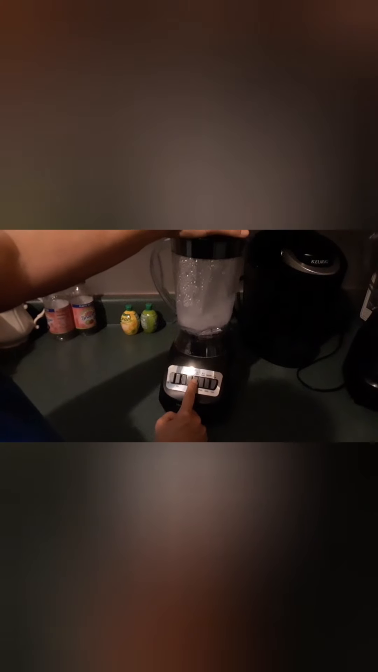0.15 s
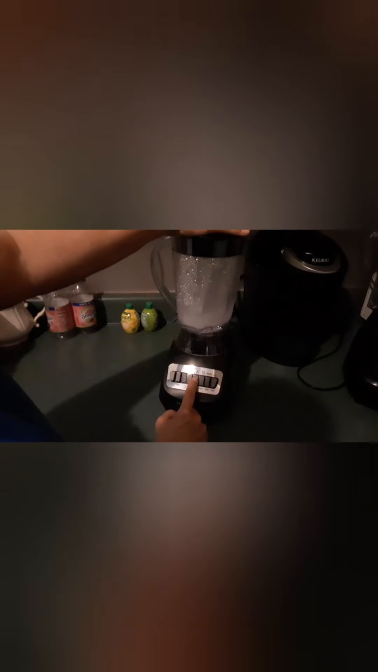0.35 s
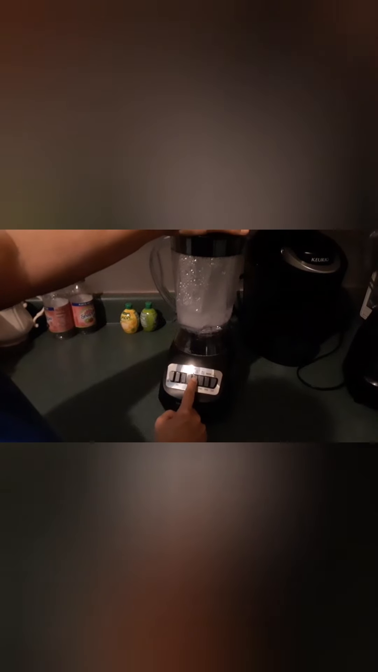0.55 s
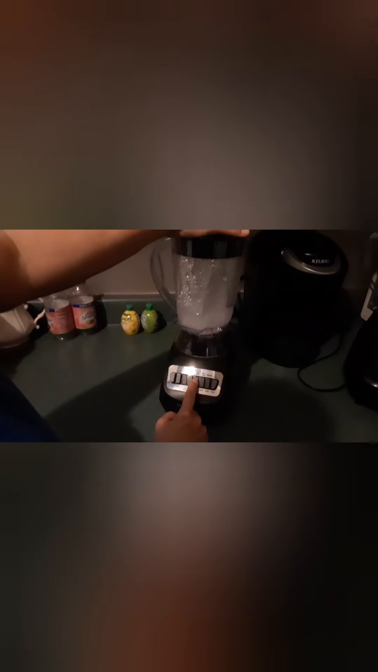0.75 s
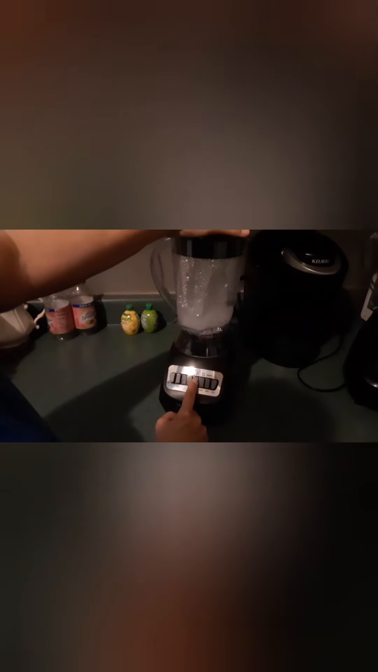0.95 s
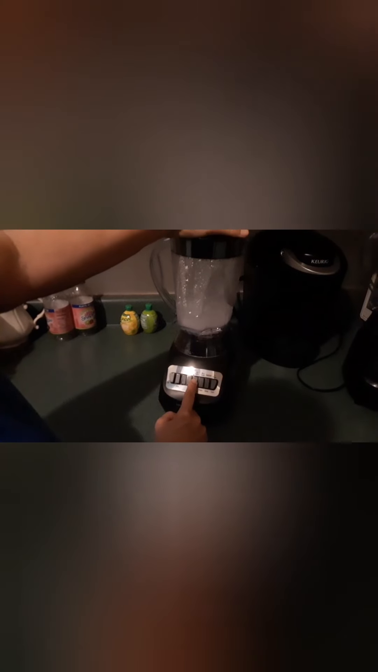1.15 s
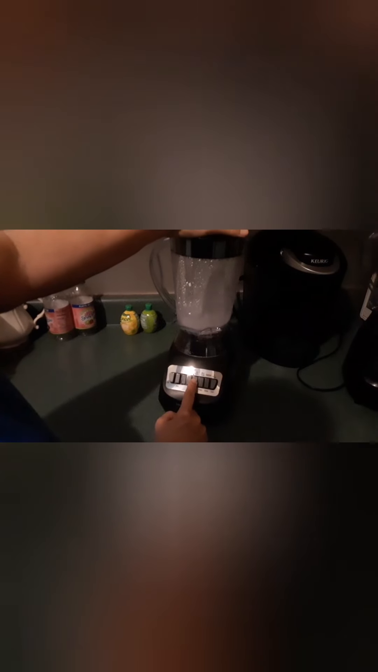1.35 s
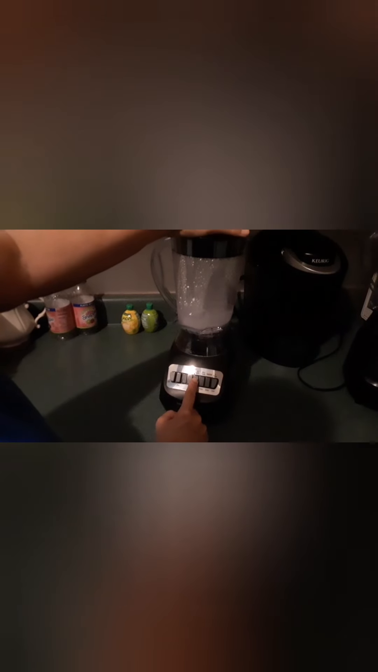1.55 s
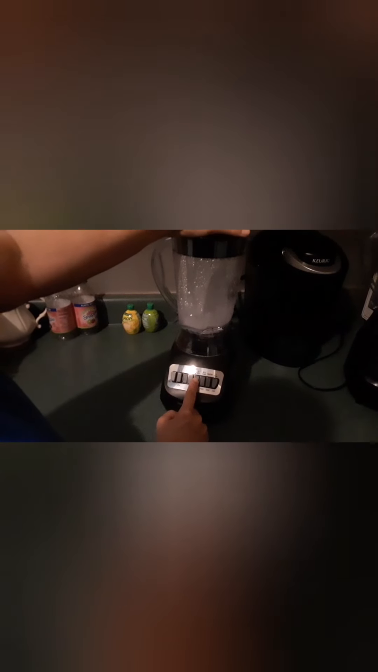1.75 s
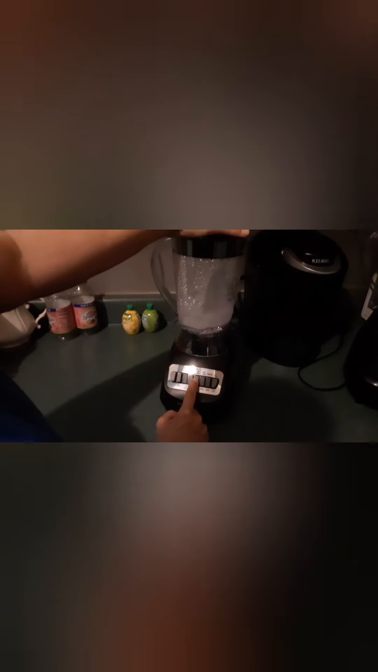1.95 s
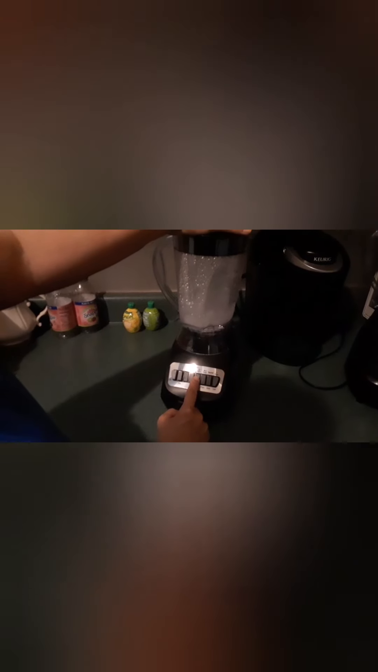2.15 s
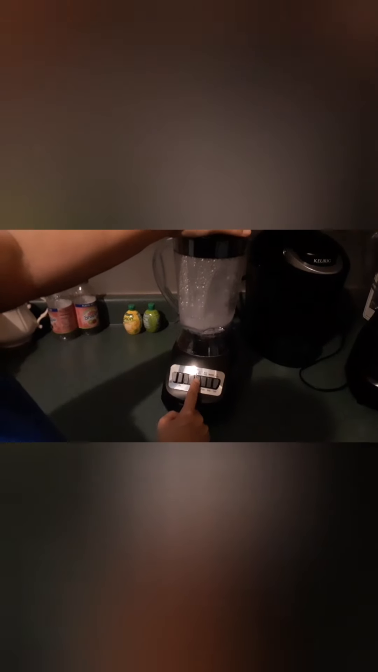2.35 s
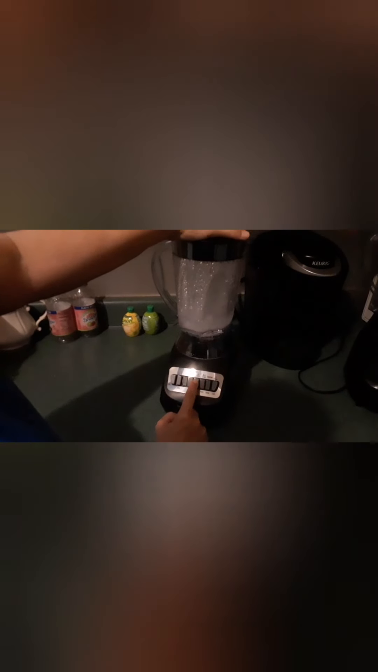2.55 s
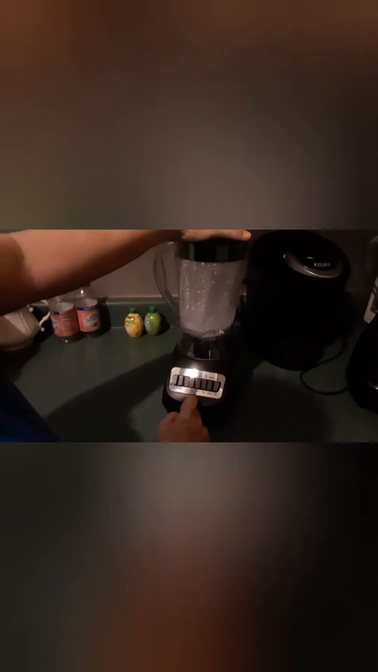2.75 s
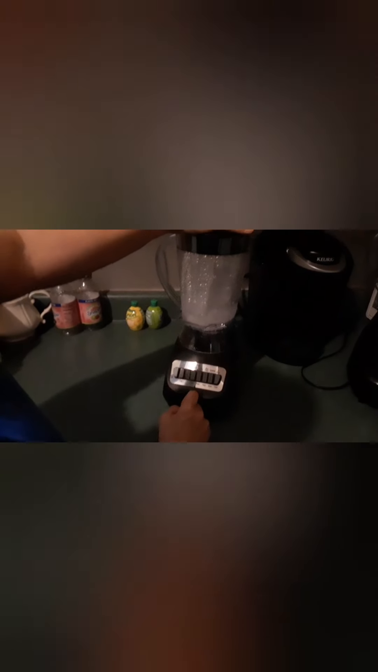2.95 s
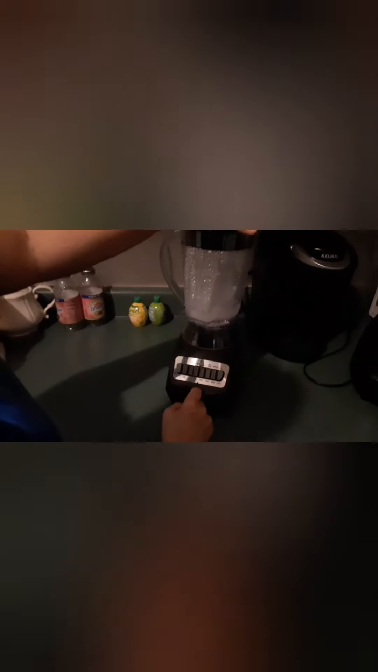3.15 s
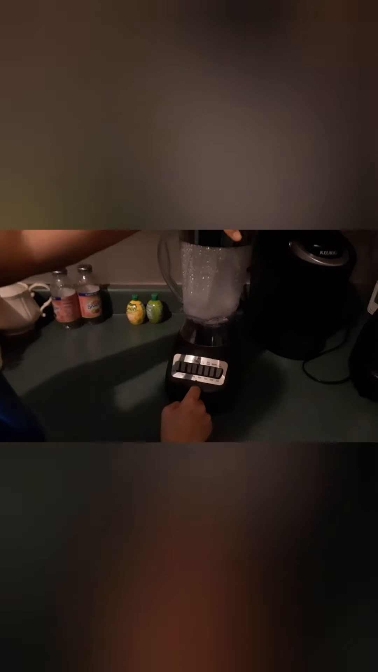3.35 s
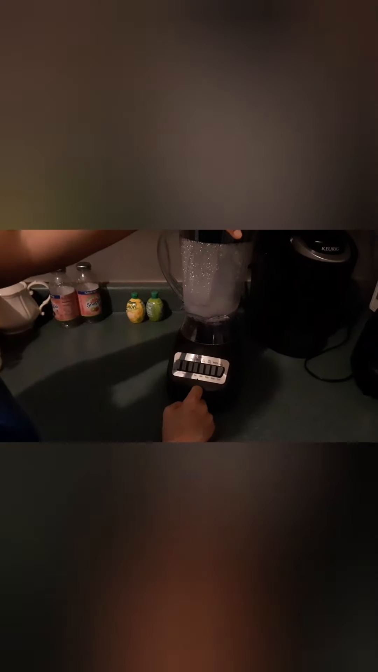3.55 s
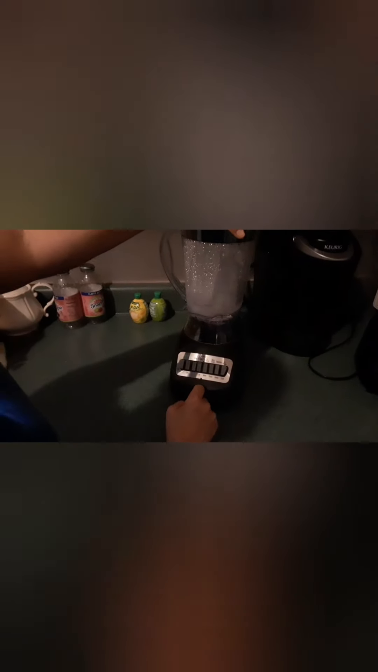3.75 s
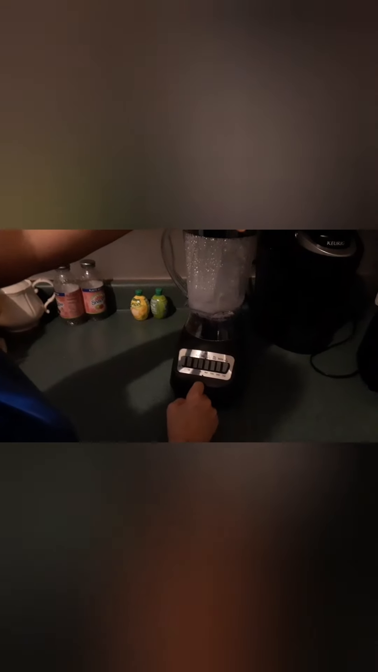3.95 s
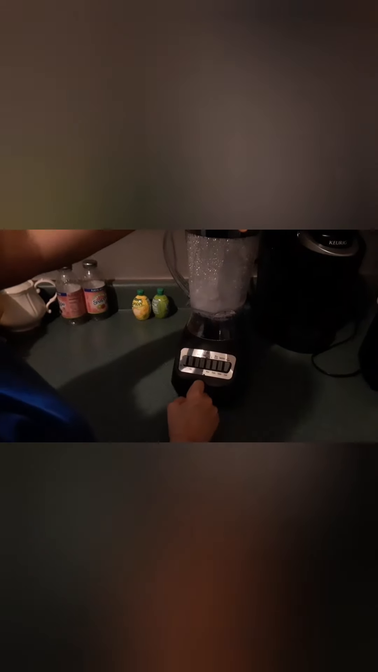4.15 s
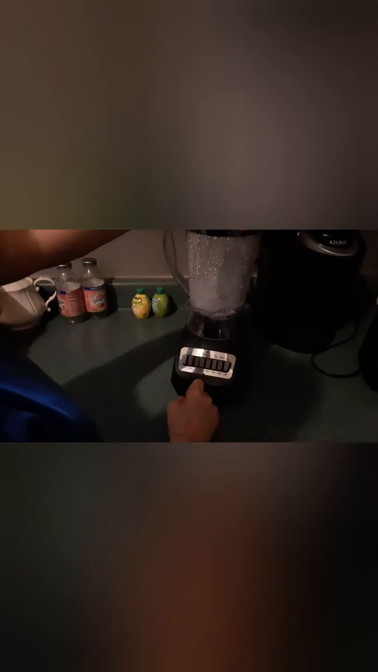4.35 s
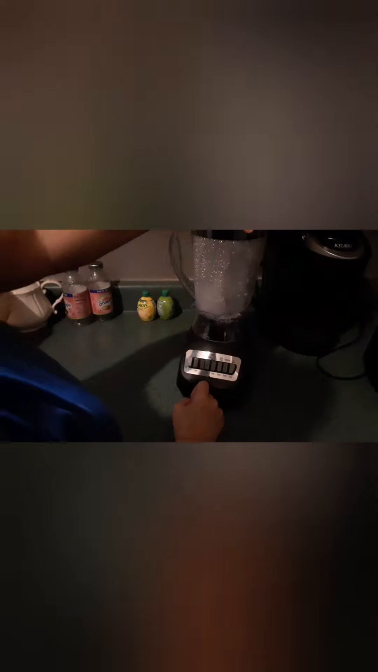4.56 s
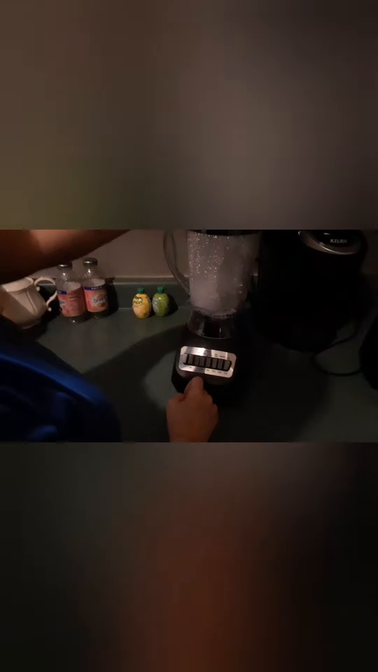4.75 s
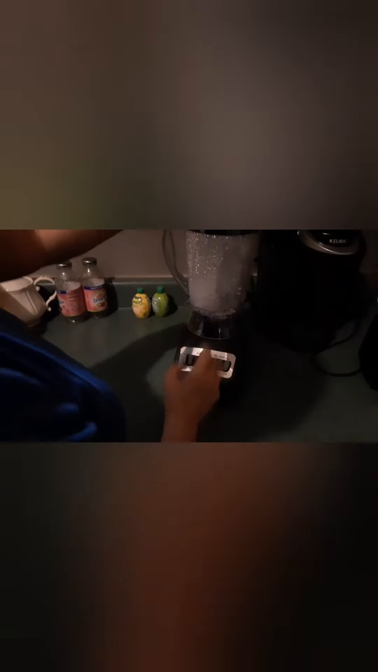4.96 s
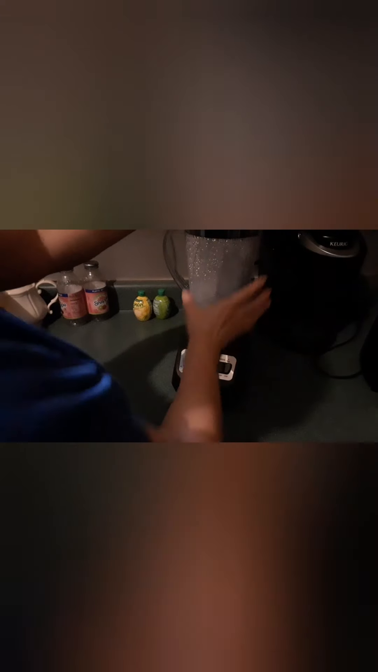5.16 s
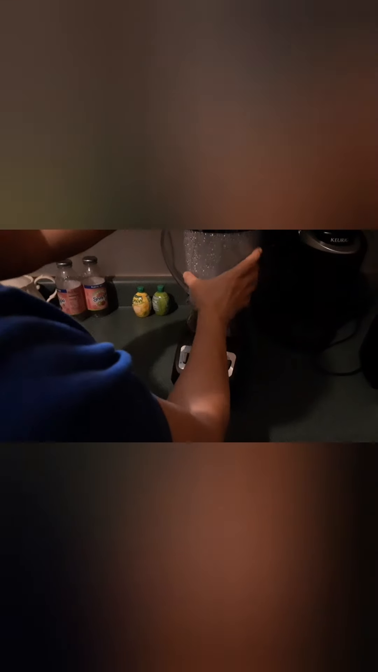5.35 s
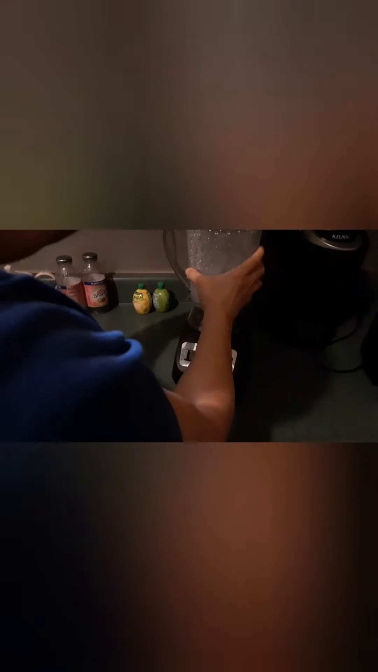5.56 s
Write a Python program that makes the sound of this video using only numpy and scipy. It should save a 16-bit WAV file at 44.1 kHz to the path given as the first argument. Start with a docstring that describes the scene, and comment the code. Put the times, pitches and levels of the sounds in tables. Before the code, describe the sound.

A blender runs with a steady whine and a gritty rush of ice against its plastic jar, a little right of close stereo microphones in a kitchen. The power cuts and the motor coasts down in pitch, scraping and squeaking faintly while a few ice lumps crunch and clatter. A quiet appliance hum remains once it stops. Finally, fingers tap the jar and a palm slides into a grip.

```python
"""A blender on a kitchen counter, a little right of a close pair of microphones. It churns crushed ice in
its plastic jar while the base shakes and the rotor whines. Switched off at about 2 s, it coasts: the
harmonics glide down, the brushes rub and squeak faintly, and the slowing blades knock the last lumps
about. The low hum of the room comes forward as the rotor stops, at about 4.5 s. Last, a hand takes
hold of the jar."""
import sys
import numpy as np
from scipy import signal
from scipy.fft import rfft, irfft, next_fast_len
from scipy.io import wavfile

SR = 44100
rng = np.random.default_rng(int(sys.argv[2]) if len(sys.argv) > 2 else 0)


def bounce(signal):
    """Save signal as a 16-bit WAV file at the path given by the first command-line argument."""
    frames = np.transpose(np.atleast_2d(signal))
    limited = np.clip(frames, -1, 1)
    pcm = np.round(limited * 32767).astype(np.int16)
    wavfile.write(sys.argv[1], SR, pcm)


N = 251370
TIME = np.arange(N) / SR
FULL_SPEED_HZ, OFF_S, STOP_S = 317.6, 2.087, 4.52      # rotor speeds are in turns per second

# Spectrum of the base when shaken or jolted. Each row: frequency in Hz, relative level in dB.
BASE_RUMBLE = [(24, -71), (40, -36.5), (75, -25), (112, -13), (189, -7), (278, -8.5), (322, 2), (399, -2),
               (427, -9), (462, -5), (600, -8.5), (780, -30), (1320, -120)]


def from_db(db):
    """Decibels to gain."""
    return 10 ** (np.asarray(db) / 20)


def rms_one(x):
    """Scale to unit power."""
    return x / np.sqrt(np.mean(x ** 2) + 1e-20)


def at_hz(points, hz):
    """Read a table on a log-frequency axis."""
    known_hz, values = np.transpose(points)
    return np.interp(np.log(np.maximum(hz, 1)), np.log(known_hz), values)


def drift(rate):
    """A smooth random wander of unit power, with `rate` new values a second."""
    knots = rng.standard_normal(int(rate * N / SR) + 3)
    fine = signal.resample_poly(knots, 10, 1)
    return rms_one(np.interp(TIME * 10 * rate, np.arange(len(fine)), fine))


def butter(x, edge_hz, kind, order=2):
    """Butterworth filter."""
    return signal.sosfilt(signal.butter(order, edge_hz, kind, fs=SR, output="sos"), x)


def colour(pair, spectrum):
    """Give two unrelated signals a spectrum, and make them alike in the bass as at two close microphones."""
    # Each row: frequency in Hz, left-right likeness (capped below at 0.99, nearly identical).
    likeness = [(60, 0.5), (140, 4), (350, 1.2), (700, 0.9), (1400, 0.06), (3000, 0.26), (12000, 0)]
    size = next_fast_len(N + SR // 10)
    hz = np.arange(size // 2 + 1) * SR / size
    alike = np.clip(at_hz(likeness, hz), -.99, .99)
    mid, side = rfft(pair, size) * from_db(at_hz(spectrum, hz))
    left_right = np.sqrt(1 + alike) * mid + np.sqrt(1 - alike) * side * [[1], [-1]]
    return rms_one(irfft(left_right, size)[:, :N])


def hiss(spectrum):
    """Smooth stereo noise with a spectrum."""
    return colour(rng.standard_normal((2, N)), spectrum)


def grains(per_s, spread_db):
    """Tiny random impacts of uneven size."""
    born = rng.random((2, N)) < per_s / SR
    return rms_one(born * rng.standard_normal((2, N)) * from_db(spread_db * rng.standard_normal(N)))


def partial(angle, waver, rate=14):
    """A tone whose strength and phase waver, differently at each microphone."""
    sway = np.array([drift(rate) + 1j * drift(rate) for side in range(2)])
    return np.sqrt(2) * np.real((1 + waver * sway) * np.exp(1j * angle)) / np.sqrt(1 + 2 * waver ** 2)


def resonate(x, peaks):
    """Parallel resonances of alternating sign, scaled to unit power."""
    out = 0
    for k, (hz, width_hz, db) in enumerate(peaks):
        radius = np.exp(-np.pi * width_hz / SR)
        forward = np.array([1, 0, -1]) * (1 - radius ** 2) / 2
        feedback = [1, -2 * radius * np.cos(2 * np.pi * hz / SR), radius ** 2]
        out = out + (-1) ** k * from_db(db) * signal.lfilter(forward, feedback, x)
    return rms_one(out)


def kitchen(x, wet_db, t60_s=0.17):
    """Dense reflections off counter, wall and cupboards; in the bass both microphones hear the same."""
    t = np.arange(SR // 2) / SR
    tail = rng.standard_normal((2, len(t))) * from_db(-60 * t / t60_s) * (t > .002)
    tail = butter(tail, 580, "high") + butter(tail[0], 600, "low")
    tail *= from_db(wet_db) / np.sqrt(np.sum(tail ** 2) / 2)
    return (x + signal.fftconvolve(x, tail, axes=1)[:, :N]) / np.sqrt(1 + from_db(2 * wet_db))


def rotor_speed(drag_ratio=2.15):
    """Steady under power, then braked by constant friction and by air drag that grows with speed squared."""
    time_left = np.clip((STOP_S - TIME) / (STOP_S - OFF_S), 0, 1)
    bend = np.sqrt(drag_ratio)      # the ratio is drag over friction at full speed
    return FULL_SPEED_HZ * np.tan(time_left * np.arctan(bend)) / bend


def by_speed(speed, full_db, fall_db, last_turns_s=4.486, dying_db_per_s=88):
    """Gain of a sound that loses fall_db each time the speed halves and dies away with the last turns."""
    pace = np.maximum(speed / FULL_SPEED_HZ, .04)
    dying_db = dying_db_per_s * np.maximum(TIME - last_turns_s, 0)
    return from_db(full_db + fall_db * np.log2(pace) - dying_db)


def share(speed, low_hz, high_hz):
    """A ramp from 0 below one speed to 1 above another."""
    return np.clip((speed - low_hz) / (high_hz - low_hz), 0, 1)


def under_power(speed):
    """About 1 while the motor is driven, 0 just after the switch-off."""
    return share(speed, .95 * FULL_SPEED_HZ, FULL_SPEED_HZ)


def fading(x, speed, body_db, body_fall_db, hiss_db, hiss_fall_db):
    """Body and hiss of a noise each fall with speed at their own rate."""
    body = rms_one(butter(butter(x, 480, "high", order=4), 4780, "low", order=5))
    top = rms_one(butter(x, 4960, "high", order=5))
    return by_speed(speed, body_db, body_fall_db) * body + by_speed(speed, hiss_db, hiss_fall_db) * top


def jar_rings(x):
    """The jar wall's modes, set ringing by whatever hits it."""
    # Each row: frequency in Hz, relative level in dB, seconds to die away by 60 dB.
    wall_modes = [(764, -22, 0.036), (1437, -3, 0.065), (1774, -2, 0.11), (2046, -4, 0.13),
                  (2260, -3.5, 0.13), (2480, -5.5, 0.22), (3003, -4, 0.057), (3640, -16, 0.092),
                  (5200, -18.5, .06)]
    return resonate(x, [(hz, np.log(1000) / (np.pi * t60), db) for hz, db, t60 in wall_modes])


def churning_ice(speed):
    """Ice grains pelt the jar and swirl round it, while larger chips tap the wall."""
    # Spectrum of the pelting. Each row: frequency in Hz, relative level in dB.
    slush_spectrum = [(260, -39.5), (450, -13), (692, -11.5), (767, -4), (1000, -10), (1330, -7.5),
                      (1840, -2.5), (2070, -5.5), (2550, 1.5), (3100, -3), (3450, -6), (4610, -6.5),
                      (5110, -8), (10300, -10), (11200, -9.5), (15500, -20)]
    # Resonances of the jar. Each row: frequency in Hz, width in Hz, relative level in dB.
    jar_peaks = [(778, 69, -4.1), (1167, 88, 0.1), (2490, 430, -3.5), (3676, 97, 6), (4704, 89, 4.5),
                 (6810, 70, 1.5), (7700, 130, -2), (9040, 400, -1.5), (11200, 210, -1.5)]
    clumping = from_db(.5 * drift(16) + 0.82 * drift(70))      # ice falls onto the blades in clumps
    pelting = grains(per_s=24000, spread_db=.5) * clumping
    swirling = resonate(grains(per_s=12000, spread_db=1.0) * clumping, jar_peaks)
    chips = jar_rings(grains(per_s=700, spread_db=2.5))
    slush = colour(pelting, slush_spectrum) + from_db(-7.5) * swirling + from_db(-10.5) * chips
    slush = kitchen(slush, wet_db=-7.0)
    return fading(slush, speed, body_db=-15.5, body_fall_db=9.0, hiss_db=-17.5, hiss_fall_db=16.5)


def shaking_base(speed, angle):
    """Unbalance shakes the base once a turn, most early in the coast; the rumble deepens as it slows."""
    # Spectrum of the base at low speed. Each row: frequency in Hz, relative level in dB.
    coast_rumble = [(29, -41), (50, -18), (113, -6), (157, 1.5), (195, -1.5), (305, -2), (335, 1.5),
                    (458, -10), (600, -16.5), (780, -20), (1320, -120)]
    fast, powered = share(speed, low_hz=165, high_hz=307), under_power(speed)
    rumble = np.sqrt(fast) * by_speed(speed, full_db=-34.5, fall_db=6.5) * hiss(BASE_RUMBLE)
    deep = np.sqrt(1 - fast) * by_speed(speed, full_db=-41.5, fall_db=1.5) * hiss(coast_rumble)
    wobble = share(speed, low_hz=192, high_hz=216) * by_speed(speed, full_db=-30.0, fall_db=13)
    tone_gain = powered * from_db(-44.0) + (1 - powered) * wobble
    return rumble + deep + tone_gain * partial(angle, waver=0.11, rate=24)


def rotor_whine(speed, angle, mains_hz=60):
    """Blades and fan sing at multiples of the rotor speed and fade fast as it falls."""
    # Each row: multiple of the speed, level in dB under power, level in dB coasting before the losses.
    rotor_harmonics = [(2, -42, -36.5), (4, -51.5, -43.5), (5, -33, -37), (6, -32, -27.5), (7, -52.5, -37),
                       (8, -39.5, -42), (10, -36, -27.5), (14, -46, -52)]
    pace, powered = speed / FULL_SPEED_HZ, under_power(speed)
    fade_db = -60 * np.maximum(.76 - pace, 0)
    tones = 0
    for k, on_db, off_db in rotor_harmonics:
        # the jar radiates poorly below its main modes
        radiated_db = np.interp(k * speed, [1300, 1420], [-7, 0])
        level_db = powered * on_db + (1 - powered) * (off_db + fade_db + radiated_db)
        tones = tones + from_db(level_db) * partial(k * angle, waver=.6, rate=30)
    # the torque pulses at twice the mains rate, which puts a tone below the sixth and first harmonics
    pulsing = 2 * np.pi * 2 * mains_hz * TIME
    buzz = from_db(-34) * partial(6 * angle - pulsing, waver=1.0, rate=18)
    buzz += from_db(-50.0) * partial(angle - pulsing, waver=0.32)
    return tones + buzz * powered


def brush_rub(speed, angle):
    """The brushes rub, swelling once a turn, and set the motor ringing."""
    # Spectrum of the rubbing. Each row: frequency in Hz, relative level in dB.
    rub_spectrum = [(260, -41), (450, -3), (623, -12), (790, -1), (903, -17), (1020, -3), (1290, -4),
                    (1890, -7.5), (2450, -7), (2900, -11.5), (3860, -16.5), (6000, -13.5), (7740, -16),
                    (9380, -11.5), (10300, -16), (11600, -12.5), (15500, -23.5)]
    # Resonances of the motor. Each row: frequency in Hz, width in Hz, relative level in dB.
    motor_peaks = [(1650, 80, -9), (2040, 64, 7), (2700, 100, -14.5), (3900, 30, -6.5), (4550, 140, -5.5),
                   (9410, 58, -11)]
    rubbing = grains(per_s=14000, spread_db=2.5) * (1 + 0.25 * np.cos(angle)) * from_db(1.03 * drift(32))
    ringing = resonate(grains(per_s=4500, spread_db=9.5), motor_peaks)
    rub = kitchen(colour(rubbing, rub_spectrum) + from_db(-6) * ringing, wet_db=-6.5)
    return fading(rub, speed, body_db=-24.5, body_fall_db=5.5, hiss_db=-28.5, hiss_fall_db=5.5)


def brush_scrape(speed, pitch_hz=2530, sag_hz=712, sag_speed_hz=35):
    """With the power off, the brushes scrape to a halt on a rough note that sags in the last turns."""
    hz = pitch_hz - sag_hz * np.exp(-speed / sag_speed_hz)
    scrape = partial(2 * np.pi * np.cumsum(hz) / SR, waver=3.6, rate=380)
    return (1 - under_power(speed)) * by_speed(speed, full_db=-44.0, fall_db=2) * scrape


def swells(events, half_s):
    """A brief rounded rise and fall of gain for each event."""
    return sum(from_db(db) * np.exp(-((TIME - s) / half_s) ** 2) for s, db in events)


def commutator_squeaks(speed, angle, bars=12, squeal_hz=9200):
    """Brushes squeak at multiples of the bar rate, through the housing's resonances; thin squeals join in."""
    # What the housing lets through. Each row: frequency in Hz, gain in dB.
    housing = [(3800, -30), (5400, -3), (6700, 0), (7500, -12), (8200, -3), (8800, -14), (9450, 2),
               (10000, -25)]
    # Gliding squeaks. Each row: peak time in seconds, level in dB ahead of the housing.
    squeaks = [(3.12, -41), (3.48, -45), (3.72, -50)]
    # Squeals on one pitch. Each row: peak time in seconds, level in dB.
    squeals = [(3.40, -44), (3.52, -38), (3.61, -47), (3.695, -43), (3.84, -46), (3.885, -45), (3.94, -51)]
    squeak = sum(from_db(at_hz(housing, k * bars * speed)) * partial(k * bars * angle, waver=1.0, rate=60)
                 for k in range(2, 14))
    squeal = partial(2 * np.pi * squeal_hz * TIME, waver=1.7, rate=100) * (1 + .5 * np.cos(angle))
    return swells(squeaks, half_s=0.034) * squeak + swells(squeals, half_s=0.018) * squeal


def bursts(events, spectrum, grain_db):
    """Each contact is a swarm of small slips and fractures that swells and dies."""
    out = np.zeros((2, N))
    swarm = colour(grains(per_s=20000, spread_db=grain_db), spectrum)
    dull = butter(swarm, 3700, "low", order=1)
    for peak_s, db, swell_s, decay_s, treble_db in events:
        log_shape = np.minimum((TIME - peak_s) / swell_s, (peak_s - TIME) / decay_s)
        shape = np.exp(np.maximum(log_shape, -40))
        out += from_db(db) * shape * (dull + from_db(treble_db) * (swarm - dull))
    return out


def ice_lumps(knock_attack_s=0.00023, knock_decay_s=0.011, jolt_swell_s=0.0045, jolt_decay_s=0.02):
    """The slowing blades crunch lumps, which jolts the base, and throw them at the jar, which rings."""
    # Blades breaking a lump. Each row: peak time in seconds, relative level in dB, decay in seconds.
    blade_hits = [(3.168, -21.5, 0.011), (3.234, -24.5, 0.024), (3.261, -20, 0.049), (3.331, -12, 0.01),
                  (3.343, -12.5, 0.022), (3.568, -24.5, 0.013), (4.002, -25.5, 0.0071), (4.046, -31, .01)]
    # Loose lumps on the wall. Each row: peak time in seconds, relative level in dB, treble in dB.
    wall_hits = [(3.552, -20.5, -6.5), (3.579, -27.5, 13.5), (3.602, -25, 8.5), (3.634, -24.5, 12.5),
                 (3.7519, -14, 1), (3.967, -22, -14.5), (3.987, -17.5, 6), (4.167, -39, 4),
                 (4.204, -35, 6.5), (4.335, -36.5, -18)]
    # Spectrum of both kinds of hit. Each row: frequency in Hz, relative level in dB.
    hit_spectrum = [(71, -44), (120, -16), (353, -23), (519, -11), (796, -4.5), (1300, -9), (1660, 1),
                    (1950, -3.5), (2320, 2), (2850, -10.5), (4970, -13), (7780, -21), (12400, -17.5),
                    (15500, -30)]
    crunches = [(s, db, 0.353 * decay, decay, 0.5) for s, db, decay in blade_hits]
    # a harder knock is brighter and shorter: 14 dB more treble halves the decay
    knocks = [(s, db, knock_attack_s, knock_decay_s * .5 ** (treble_db / 14), treble_db)
              for s, db, treble_db in wall_hits]
    jolts = [(s, db - 19, jolt_swell_s, jolt_decay_s, 0) for s, db, _ in blade_hits]
    cracks = bursts(crunches + knocks, hit_spectrum, grain_db=0.5)
    ringing = jar_rings(cracks) * np.std(cracks) * from_db(-22.5)
    clatter = from_db(-0.5) * kitchen(cracks + ringing, wet_db=-7.5)
    return clatter + bursts(jolts, BASE_RUMBLE, grain_db=0.5)


def room_tone(rise_from_s=3.3, rise_db_per_s=5.5):
    """Low room noise and the hum of appliances, which come forward as the motor dies."""
    # Spectrum of the room noise. Each row: frequency in Hz, relative level in dB.
    room_spectrum = [(15, -47.5), (25, -26.5), (113, -3), (233, -10), (289, 0.5), (369, -7), (470, -12),
                     (552, -11.5), (1200, -15), (1580, -20), (2770, -24.5), (6220, -32.5), (7710, -44),
                     (11900, -34), (15500, -38)]
    # Hum of appliances. Each row: frequency in Hz, relative level in dB.
    hum_tones = [(59, -10), (113, -15.5), (165, -10.5), (294, -8.5), (467, -12)]
    hum = sum(from_db(db) * partial(2 * np.pi * hz * TIME, waver=0.56) for hz, db in hum_tones)
    gain = from_db(-59.5 + rise_db_per_s * np.maximum(TIME - rise_from_s, 0))
    return gain * (from_db(-0.5) * hiss(room_spectrum) + hum)


def hand_on_jar(tap_attack_s=0.00078, slide_swell_s=0.012, slide_decay_s=0.015):
    """Fingers tap the jar and the palm slides into its grip."""
    # Each row: peak time in seconds, relative level in dB, decay in seconds, treble in dB.
    finger_taps = [(5.268, -40.5, .029, -7), (5.516, -32, .01, -1), (5.6596, -36.5, 0.0068, -13)]
    # Each row: peak time in seconds, relative level in dB, treble in dB.
    palm_slides = [(5.398, -47.5, 2), (5.444, -55.5, 13.5), (5.498, -43, 2)]
    # Spectrum of skin on plastic. Each row: frequency in Hz, relative level in dB.
    touch_spectrum = [(71, -33), (120, 0), (346, 0), (563, -6.5), (1660, -6), (2200, -13), (2390, -14),
                      (5070, -17.5), (7620, -24), (15500, -20.5)]
    taps = [(s, db, tap_attack_s, decay, treble_db) for s, db, decay, treble_db in finger_taps]
    slides = [(s, db, slide_swell_s, slide_decay_s, treble_db) for s, db, treble_db in palm_slides]
    return from_db(5.0) * kitchen(bursts(taps + slides, touch_spectrum, grain_db=-1.0), wet_db=-1.5)


def place(x):
    """The blender stands a little to the right of the microphones, which the treble shows most."""
    # Stereo balance. Each row: frequency in Hz, left minus right in dB.
    balance = [(60, -7), (120, 4), (240, -1), (480, 2.5), (950, 2.5), (1890, -5), (3770, -2.5),
               (7520, -1.5), (15000, -7)]
    size = next_fast_len(N + SR // 10)
    lean_db = at_hz(balance, np.arange(size // 2 + 1) * SR / size)
    return irfft(rfft(x, size) * from_db(lean_db * np.array([[.5], [-.5]])), size)[:, :N]


def scene():
    """Blender, room and hand at the microphones; as the ice settles, the rub of the brushes takes over."""
    speed = rotor_speed() * (1 + .0015 * drift(9))      # the load of the ice makes the rotor stumble
    angle = 2 * np.pi * np.cumsum(speed) / SR
    flying = share(speed, low_hz=74.3, high_hz=281)      # share of the ice still thrown about
    grinding = np.sqrt(flying) * churning_ice(speed) + np.sqrt(1 - flying) * brush_rub(speed, angle)
    motor = shaking_base(speed, angle) + rotor_whine(speed, angle)
    brushes = commutator_squeaks(speed, angle) + brush_scrape(speed)
    return place(grinding + motor + brushes + ice_lumps()) + hand_on_jar() + room_tone()


def record(dry, cutoff_hz=15750):
    """The recorder clips any peak over full scale and cuts the top steeply."""
    low_pass = signal.ellip(12, .1, 80, cutoff_hz, fs=SR, output="sos")
    return signal.sosfilt(low_pass, np.clip(dry, -1, 1))


dry = scene()
out = record(dry)
bounce(out)
```